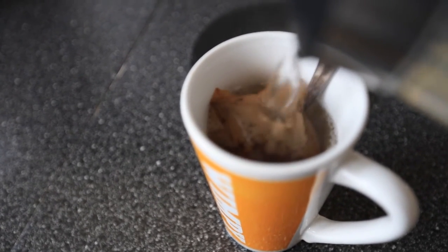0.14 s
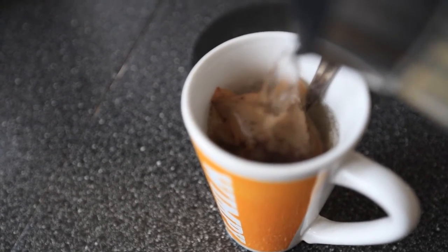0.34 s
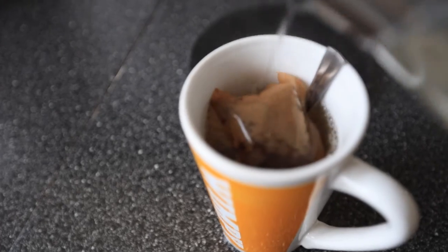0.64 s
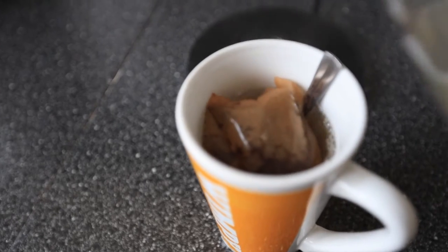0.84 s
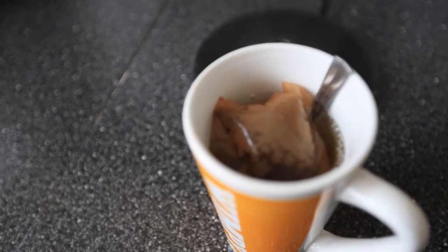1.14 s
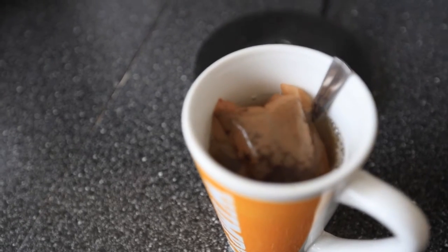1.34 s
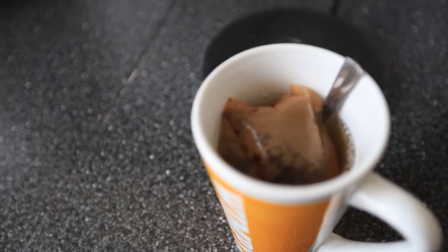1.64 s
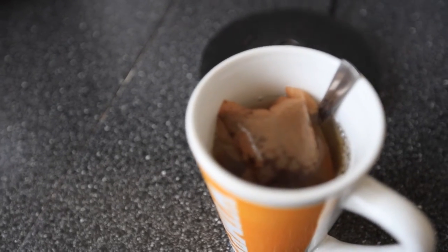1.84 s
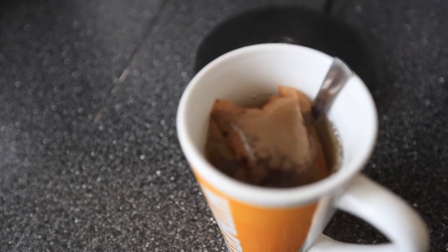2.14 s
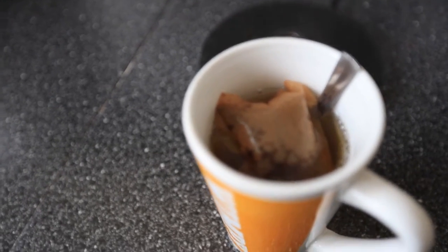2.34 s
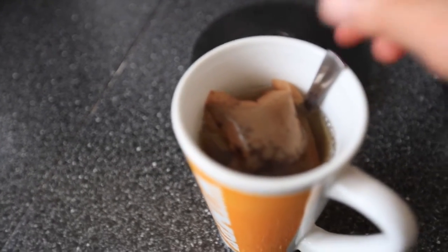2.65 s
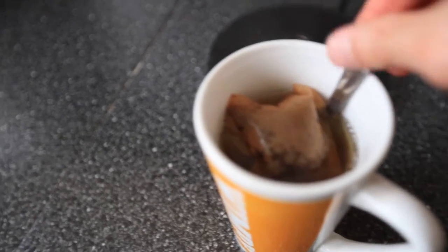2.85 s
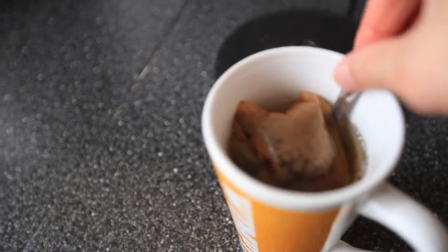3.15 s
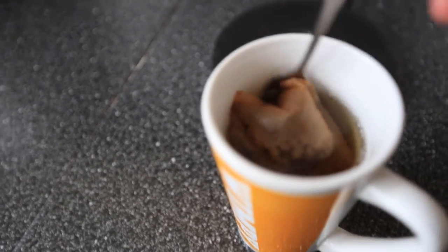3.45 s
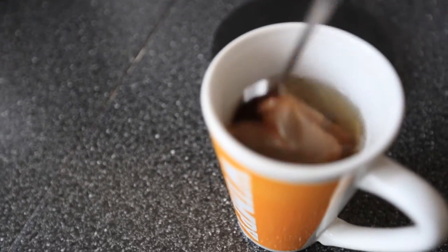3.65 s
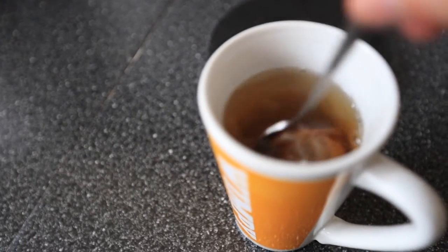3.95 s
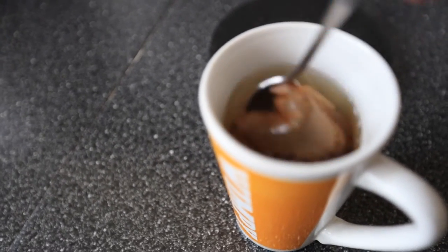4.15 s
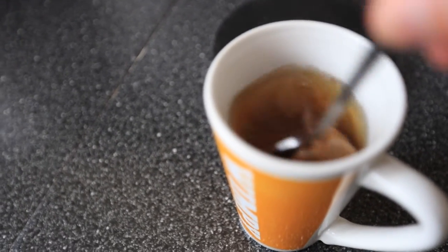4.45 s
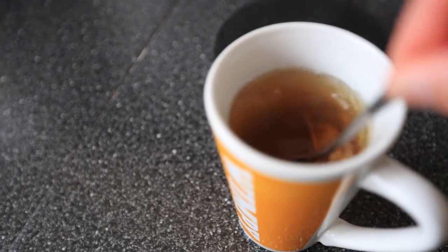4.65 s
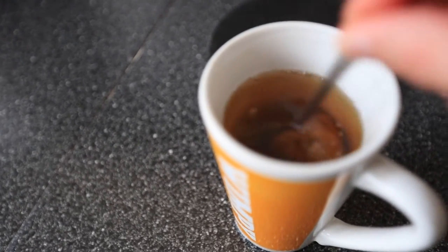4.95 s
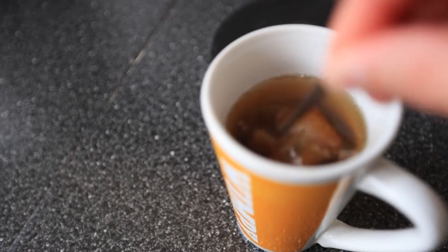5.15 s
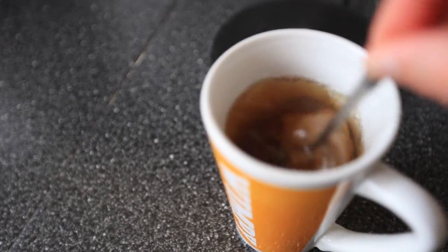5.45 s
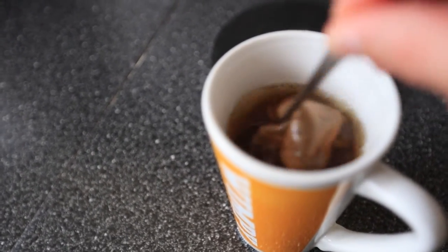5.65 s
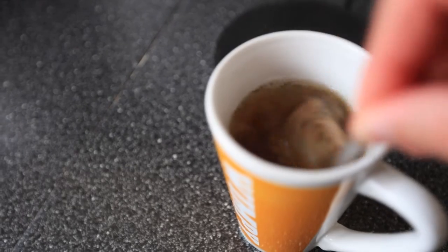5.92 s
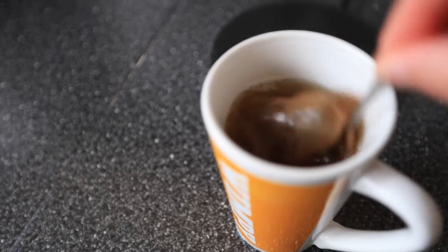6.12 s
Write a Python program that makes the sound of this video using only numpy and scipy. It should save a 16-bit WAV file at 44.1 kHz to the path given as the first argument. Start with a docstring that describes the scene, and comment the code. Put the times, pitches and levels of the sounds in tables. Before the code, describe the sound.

Last drops of hot water plop into a mug, a kettle clatters onto its base and clicks, then a teaspoon clinks and scrapes against china.

```python
"""The last of a kettle's water dribbles onto a tea bag in a china mug: each drop ticks, splashes and sounds a bubble.
The kettle is set down on its base as decaying tones and noise, and its switch snaps.
A steel teaspoon stirs: clinks set mug and spoon ringing, and a stream of tiny impacts makes it scrape.
Dull knocks, made of fading noise and tones, come from further off in a small kitchen, over a low hum and soft hiss."""
import sys
import numpy as np
from scipy import signal
from scipy.fft import rfft, irfft
from scipy.io import wavfile

SR = 44100
rng = np.random.default_rng(int(sys.argv[2]) if len(sys.argv) > 2 else 0)


def wav_record(signal):
    """Record a signal, one row per channel, as 16-bit PCM in the file named by sys.argv[1]."""
    frames = np.transpose(np.atleast_2d(signal))
    bounded = np.clip(frames, -1, 1)
    # unit amplitude maps onto the largest positive 16-bit level
    quanta = np.round(bounded * 32767).astype(np.int16)
    wavfile.write(sys.argv[1], SR, quanta)


N = 276948
TIME = np.arange(N) / SR
AGE = TIME[:SR]  # seconds since a blow

# tones of the steel spoon when it rings freely: f/Hz, relative level/dB, time to fall by 60 dB/s
SPOON_MODES = [(1218, -0.5, 0.035), (1996, -5.5, 0.037), (4080, -35, 0.03), (4780, -1.5, 0.051),
               (5180, -15, 0.038), (6160, -11, 0.048), (7030, -0.5, 0.052), (7440, -7.5, 0.069),
               (9450, -23, 0.058), (10200, -14.5, 0.02), (10970, -13.5, 0.039), (13380, -25, 0.035)]


def water(glide=0.093, bubble_t60_s=0.008, splash_q=1.0):
    """A fine patter; each drop ticks, splashes and traps a bubble that rises in pitch as it fades."""
    # drops landing in the mug: t/s, splash level/dB, tick peak level/dB, splash f/Hz
    drops = [(0.0587, -33.5, -37, 3240), (.265, -43, -33, 9000), (.281, -37, -50, 3400),
             (0.3617, -41, -43, 7800), (0.4025, -27.5, -27.5, 3530), (.6236, -13, -13.5, 2400),
             (.6407, -26, -29, 13100), (0.6632, -23.5, -19, 1680), (0.6666, -32, -22, 3200),
             (0.6956, -30.5, -26, 3750), (.8332, -40, -31.5, 11500), (1.141, -41, -42, 5440),
             (2.561, -40, -34, 5400), (4.545, -37.5, -45, 4200), (5.341, -35.5, -26, 9900),
             (5.398, -38.5, -33, 2400)]
    stream_db, stream_t60_s = -56, 0.82  # the stream thins away on the tea bag
    dribble_s, dribble_length_s, dribble_db = 0.491, 0.86, -63.5  # then a faint dribble runs on
    splash_t60_s = 0.019
    # the bubble sounds a little under its splash, and weaker the higher the drop
    bubble_ratio, bubble_db, bubble_fade_hz = 0.878, 1, 5030

    dribble = stroke(dribble_s, dribble_length_s, attack_s=0.026, sag_db=8, release_t60=0.5)
    flow = undb(stream_db - 60 * TIME / stream_t60_s) + undb(dribble_db) * dribble
    out = flow * band(grains(rate=900, spread_db=5), hz=2200, q=0.5)

    # running the bubble's clock ever faster raises its pitch
    rise = glide * np.minimum(AGE, bubble_t60_s) ** 2 / (2 * bubble_t60_s)
    for s, splash_db, tick_db, hz in drops:
        tick = band(signal.unit_impulse(SR), hz, q=0.22)
        tick = tick / np.max(np.abs(tick))
        splash = band(rng.standard_normal(SR), hz, splash_q) * fade(splash_t60_s, rise_s=0.0019)
        bubble = np.sin(2 * np.pi * bubble_ratio * hz * (AGE + rise))
        bubble = bubble * fade(bubble_t60_s, rise_s=0.0001)
        trapped = undb(bubble_db) * np.exp(-(hz / bubble_fade_hz) ** 2)
        add(out, s, undb(tick_db) * tick + undb(splash_db) * (splash + trapped * bubble))
    return out


def kettle(bass_hz=93, shell_rub_db=-6, grit_db=-12):
    """The kettle lands, rocks and judders over its base, drops into its seat, and its switch snaps."""
    # the kettle meeting its base: t/s, hollow body level/dB, plastic shell level/dB, clatter level/dB
    landings = [(1.485, -48, -39, -45), (1.5059, -9.5, -7.5, -19.5), (1.513, -23, -16.5, -21.5),
                (1.6137, -18, -20, -39), (1.62, -22, -41, -26), (1.637, -19, -21, -36),
                (1.840, -32, -30, -37), (1.8606, -12, -27, -30), (1.908, -16.5, -23.5, -26),
                (1.9176, -19, -35, -12)]
    # tones of the hollow body: f/Hz, relative level/dB, time to fall by 60 dB/s
    body_modes = [(121.7, -4, 0.16), (146.8, -4, 0.09), (174, -4.5, 0.075), (238.4, -7, 0.1),
                  (300, -10.5, 0.059), (354, -12.5, 0.066), (422, -23, 0.14)]
    # tones of the plastic shell: f/Hz, relative level/dB, time to fall by 60 dB/s
    shell_modes = [(812, 1, 0.0081), (974, 3, 0.028), (1227, 7, 0.034), (1287, 6.5, 0.032),
                   (1416, 3, 0.032), (1560, -25, 0.016), (1650, -13, 0.024)]
    # colour of the clattering noise: f/Hz, relative level/dB
    clatter_colour = [(150, 1.5), (450, 4.5), (760, 3), (1100, -7.5), (2700, -9.5), (4000, -20.5),
                      (7000, -24.5), (15000, -46)]
    # the foot judders across the base: t/s, length/s, level/dB
    judders = [(1.527, 0.031, -30.5), (1.645, 0.28, -28)]
    # tones of the switch: f/Hz, relative level/dB, time to fall by 60 dB/s
    switch_modes = [(2404, 3, 0.065), (2510, 1, 0.07), (2540, -5, 0.053), (2670, -8, 0.055)]
    # colour of the switch's snap: f/Hz, relative level/dB
    snap_colour = [(700, -28), (1400, 4), (2000, 0), (2700, -1.5), (3500, -12), (7500, -17.5), (15000, -33)]

    body = ring(body_modes, tilt_db=-2, rise_s=0.00088)
    shell = ring(shell_modes, tilt_db=-12, rise_s=0.00036)

    push = np.zeros(N)
    for s, length, db in judders:
        push += undb(db) * stroke(s, length, attack_s=0.003, sag_db=40, release_t60=0.2)
    hardness = push / np.max(push)  # the shell joins in only while the push is firm
    body_rub = rub(body, rate=300, spread_db=3)
    shell_rub = rub(shell, rate=250, spread_db=3)
    grit = rub(noise(clatter_colour, SR) * fade(t60=0.012, rise_s=0.0003), rate=350, spread_db=4)
    out = push * (body_rub + undb(shell_rub_db) * hardness * shell_rub + undb(grit_db) * grit)

    for s, body_db, shell_db, clatter_db in landings:
        clatter = noise(clatter_colour, SR) * fade(t60=0.063, rise_s=0.0013)
        add(out, s, undb(body_db) * body + undb(shell_db) * shell + undb(clatter_db) * clatter)

    # it settles into its seat with a longer rattle
    seat_rattle = noise(clatter_colour, SR) * fade(t60=0.27, rise_s=0.001)
    add(out, 1.937, undb(-23) * body + undb(-33.5) * seat_rattle)

    snap = noise(snap_colour, SR) * fade(t60=0.033, rise_s=0.00037)
    switch_ring = ring(switch_modes, tilt_db=0, rise_s=0.00067)
    add(out, 2.1085, undb(-26.5) * snap + undb(-31.3) * switch_ring)
    return high_pass(out, bass_hz, order=4)  # the kettle's sounds carry no deep bass


def clinks():
    """Each touch cracks, sets the mug and the spoon ringing, and thumps softly through the worktop."""
    # spoon against mug: t/s, mug level/dB, spoon level/dB, crack level/dB, ring tilt/dB per octave
    touches = [(2.953, -63, -38, -60, -9), (3.0225, -45, -26, -36, -4), (3.226, -26.5, -19, -25, 0.5),
               (3.243, -33, -30, -33, 10), (3.288, -46, -32.5, -56, -3), (4.3007, -17, -40, -16.5, -5),
               (4.3153, -22, -33, -20.5, 0), (5.043, -14, -22.5, -22.5, 3), (5.6997, -18, -29, -24.5, .5),
               (5.975, -34, -11.5, -26, 3.5)]
    # tones of the china mug: f/Hz, relative level/dB, time to fall by 60 dB/s
    mug_modes = [(2015, -6, 0.12), (2106, -5.5, 0.18), (2157, -6.5, 0.19), (3412, -5.5, 0.11),
                 (4860, 0.5, 0.055), (4950, -12, 0.091), (5915, 5, 0.052), (5850, -5, 0.041),
                 (6780, 0.5, 0.048), (7000, -5.5, 0.084), (7650, 0.5, 0.038), (7630, -4, 0.068),
                 (9750, -12, .035), (9900, -17, 0.032), (12500, -13, .03)]
    # colour of the crack before it is tilted: f/Hz, relative level/dB
    crack_colour = [(200, -20.5), (1200, -9.5), (2600, 4), (4500, 2.5), (7400, 2.5), (8500, -6.5),
                    (10800, 0), (12000, -11.5), (16000, -14)]
    # tones of the worktop: f/Hz, relative level/dB, time to fall by 60 dB/s
    worktop_modes = [(160.7, -5.5, 0.26), (235, -19, 0.17), (422, -14, 0.1), (633, -10.5, 0.032),
                     (1027, -19.5, 0.075)]
    thump_db = -21  # relative to the ring
    # the crack is dull and short where the china takes the blow, bright and longer where the steel does
    china_tilt_db, steel_tilt_db = -2.5, 5  # per octave
    china_t60_s, steel_t60_s = 0.037, 0.049

    out = np.zeros(N)
    thump = high_pass(ring(worktop_modes, tilt_db=3, rise_s=0.002), hz=110)
    for s, mug_db, spoon_db, crack_db, tilt_db in touches:
        strength = np.hypot(undb(mug_db), undb(spoon_db))
        steel_share = (undb(spoon_db) / strength) ** 2
        crack_tilt_db = china_tilt_db + steel_share * (steel_tilt_db - china_tilt_db)
        crack_t60_s = china_t60_s + steel_share * (steel_t60_s - china_t60_s)
        colour = [(hz, db + crack_tilt_db * np.log2(hz)) for hz, db in crack_colour]
        crack = noise(colour, SR) * fade(crack_t60_s, rise_s=0.00032)
        mug = ring(mug_modes, tilt_db, rise_s=0.0013)
        spoon = ring(SPOON_MODES, tilt_db, rise_s=0.0011)
        ringing = undb(mug_db) * mug + undb(spoon_db) * spoon
        add(out, s, ringing + undb(crack_db) * crack + undb(thump_db) * strength * thump)
    return out


def scrape(grit_db=-10, damping=0.42, wobble_rad=0.35, flutter_db=3.5):
    """The sliding spoon, damped by the wall, rasps in its own modes and makes the mug sing unevenly."""
    # the spoon dragged along the wall: t/s, length/s, level/dB, sag/dB per s (negative swells)
    drags = [(3.035, 0.24, -61, -32), (3.247, 0.27, -43, 51), (5.968, 0.19, -40.5, 72)]
    # the dragged spoon catches and the mug sings: t/s, length/s, level/dB, f/Hz
    squeals = [(3.347, .012, -50.5, 3375), (3.423, 0.027, -51.5, 2100), (6.033, .03, -41.5, 1954),
               (6.069, 0.091, -39, 2130)]

    rasp = np.zeros(N)
    for s, length, db, sag in drags:
        rasp += undb(db) * stroke(s, length, attack_s=0.0042, sag_db=sag, release_t60=0.082)
    pressed = [(hz, db, t60 * damping) for hz, db, t60 in SPOON_MODES]
    spoon = rub(ring(pressed, tilt_db=-6, rise_s=0.000071), rate=600, spread_db=0.5)
    grit = band(grains(rate=1500, spread_db=4), hz=1750, q=0.12)
    out = rasp * (spoon + undb(grit_db) * grit)

    # slow noise makes the note uneven: jolt shifts its phase, grip its level
    jolt = band(rng.standard_normal(N), hz=45, q=0.31)
    grip = band(rng.standard_normal(N), hz=45, q=0.31)
    for s, length, db, hz in squeals:
        song = unit(np.sin(2 * np.pi * hz * TIME + wobble_rad * jolt) * undb(flutter_db * grip))
        out += undb(db) * song * stroke(s, length, attack_s=0.0029, sag_db=22, release_t60=0.16)
    return out


def knocks():
    """Distant knocks arrive smeared by the room: a boom, a wooden body with a hollow note, a little rattle."""
    # t/s, boom level/dB, wooden body level/dB, hollow note level/dB, body and note f/Hz,
    # rattle level/dB, time to fall by 60 dB/s
    blows = [(2.366, -41, -70, -75, 241, -64, 0.43), (2.891, -49, -53, -78, 306, -72, 1),
             (2.933, -56, -43.5, -52, 774, -48, .27), (3.042, -60, -35.5, -35, 353.5, -56, 0.35),
             (3.484, -38.5, -41, -70, 296, -51, 0.7), (3.512, -34.5, -33.5, -42, 459.5, -34, .36),
             (4.016, -35, -41.5, -44.5, 348.5, -57, 0.27), (4.464, -42, -35.5, -49, 446, -57, 0.55),
             (4.551, -30.5, -36.5, -33.5, 88.7, -56, .61), (4.57, -37, -35.5, -42, 342, -41.5, .33),
             (5.154, -42.5, -42.5, -60, 540, -50, 0.62)]
    # colour of the rattle: f/Hz, relative level/dB
    rattle_colour = [(900, 0), (1500, 2), (2700, 7.5), (3400, -0.5), (4500, -15), (9000, -21), (15000, -52)]

    out = np.zeros(N)
    for s, boom_db, body_db, note_db, hz, rattle_db, t60 in blows:
        boom = band(rng.standard_normal(SR), hz=63.4, q=0.64) * fade(t60, rise_s=0.0072)
        body = band(rng.standard_normal(SR), hz, q=0.68)
        note = unit(np.sin(2 * np.pi * hz * AGE))
        wood = (undb(body_db) * body + undb(note_db) * note) * fade(t60, rise_s=0.0042)
        rattle = noise(rattle_colour, SR) * fade(t60, rise_s=0.00033)
        add(out, s, undb(boom_db) * boom + wood + undb(rattle_db) * rattle)
    return out


def background(hum_hz=98.9, hum_db=-57, waver_db=2.5, air_db=-54.5):
    """An appliance motor hums, its level wavering slightly, in the soft hiss of the room."""
    # colour of the room's hiss: f/Hz, relative level/dB
    air_colour = [(20, -33), (45, 5), (75, -6.5), (140, -2), (230, 2.5), (400, -1.5), (800, -5.5),
                  (1600, -9), (3200, -16), (6400, -20.5), (12000, -20.5), (16000, -28)]
    waver = band(rng.standard_normal(N), hz=3.63, q=0.75)
    hum = unit(np.sin(2 * np.pi * hum_hz * TIME)) * undb(hum_db + waver_db * waver)
    return hum + undb(air_db) * noise(air_colour, N)


def kitchen(x, room_db, wall_db, wall_s=0.0029):
    """A quick echo off the nearest surface, and a short tail whose treble dies first."""
    hiss = rng.standard_normal(SR)
    low = signal.lfilter(*signal.butter(1, 3000, fs=SR), hiss)
    tail = low * fade(t60=0.52, rise_s=0.0005) + (hiss - low) * fade(t60=0.3, rise_s=0.0016)
    response = undb(room_db) * tail / np.sqrt(np.sum(tail ** 2))
    response[int(wall_s * SR)] += undb(wall_db)
    return x + signal.fftconvolve(x, response)[:N]


def undb(db):
    """Decibels to gain."""
    return 10 ** (np.asarray(db) / 20)


def unit(x):
    """Scale to an average (rms) level of 1."""
    return x / np.sqrt(np.mean(x ** 2))


def add(track, s, sound):
    """Mix a sound into the track, starting at s seconds."""
    start = int(s * SR)
    track[start:start + len(sound)] += sound[:N - start]


def noise(spectrum, size):
    """Noise of rms 1, coloured by joining (Hz, dB) points along a logarithmic pitch scale."""
    hz, db = np.transpose(spectrum)
    bins = np.maximum(np.fft.rfftfreq(size, 1 / SR), 1)
    gain = undb(np.interp(np.log(bins), np.log(hz), db))
    return unit(irfft(rfft(rng.standard_normal(size)) * gain, size))


def band(x, hz, q):
    """A resonance applied twice, for steep sides; rms 1."""
    angle = 2 * np.pi * min(hz, 0.4 * SR) / SR
    loss = np.sin(angle) / (2 * q)
    b = [loss, 0, -loss]
    a = [1 + loss, -2 * np.cos(angle), 1 - loss]
    once = signal.lfilter(b, a, x)
    return unit(signal.lfilter(b, a, once))


def high_pass(x, hz, order=2):
    """Take away the bass under hz."""
    return signal.sosfilt(signal.butter(order, hz, "high", fs=SR, output="sos"), x)


def fade(t60, rise_s):
    """Envelope of a blow: a quick rise, then a fall of 60 dB every t60 seconds."""
    return undb(-60 * AGE / t60) * (1 - np.exp(-AGE / rise_s))


def stroke(s, length, attack_s, sag_db, release_t60):
    """Envelope of something sustained: it builds up, sags by sag_db a second and dies away when let go."""
    age = np.maximum(TIME - s, 0)
    held = np.minimum(age, length)
    return (1 - np.exp(-age / attack_s)) * undb(-sag_db * held - 60 * (age - held) / release_t60)


def ring(modes, tilt_db, rise_s):
    """Decaying tones that start near rms 1; a positive tilt, in dB per octave, favours the treble."""
    hz, db, t60 = np.transpose(modes)
    size = undb(db + tilt_db * np.log2(hz / hz[0]))
    size = size / np.sqrt(np.sum(size ** 2) / 2)
    return sum(a * np.sin(2 * np.pi * f * AGE) * fade(t, rise_s) for f, a, t in zip(hz, size, t60))


def grains(rate, spread_db):
    """Random tiny impacts, about rate a second, of uneven size."""
    hits = rng.random(N) < rate / SR
    return hits * rng.choice([-1, 1], N) * undb(spread_db * rng.standard_normal(N))


def rub(response, rate, spread_db):
    """Stick-slip impacts keep a body ringing; rms 1."""
    return unit(signal.fftconvolve(grains(rate, spread_db), response)[:N])


def scene():
    """The drops are the driest, kettle and spoon ring on more in the kitchen; knocks and hum lie behind."""
    pouring = kitchen(water(), room_db=-12, wall_db=-31)
    setting_down = kitchen(kettle(), room_db=-9, wall_db=-23)
    stirring = kitchen(clinks() + scrape(), room_db=-9, wall_db=-10.5)
    return (pouring + setting_down + stirring + knocks() + background())[None]


def record(dry):
    """Cut the deepest rumble and, steeply, the top of the treble."""
    treble_cut = signal.ellip(10, 0.2, 80, 15900, fs=SR, output="sos")  # ripple dB, cut dB, edge Hz
    return signal.sosfilt(treble_cut, high_pass(dry, hz=28))


dry = scene()
out = record(dry)
wav_record(out)
```